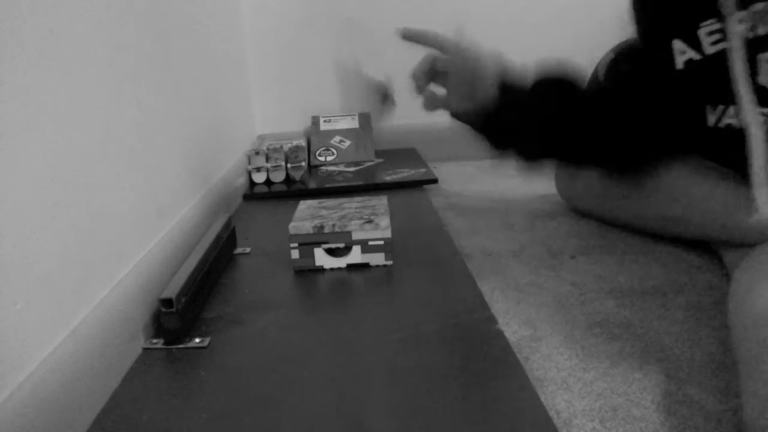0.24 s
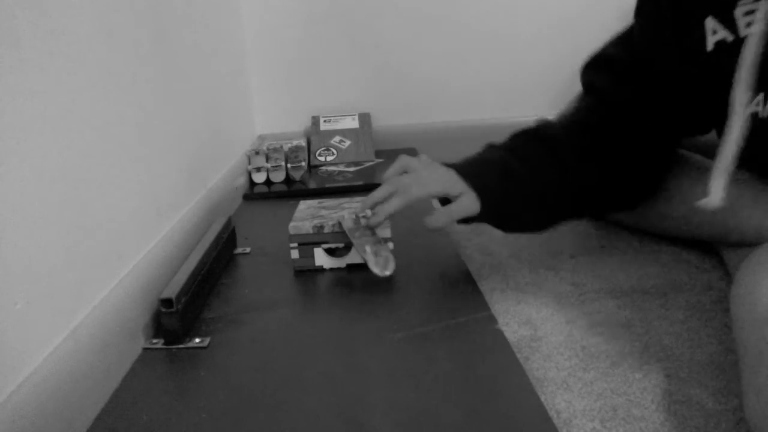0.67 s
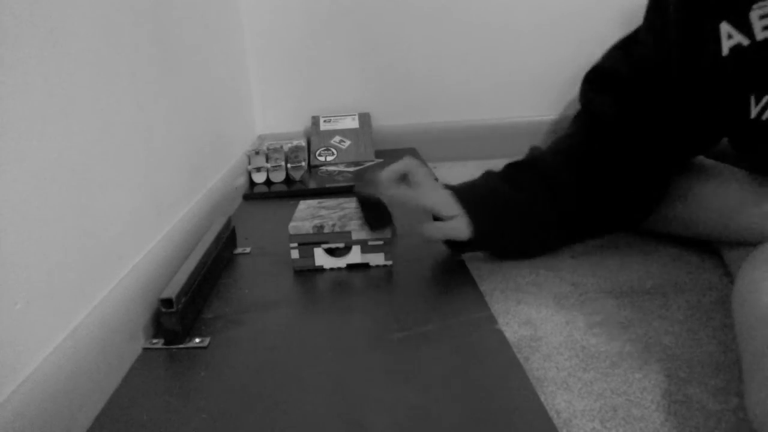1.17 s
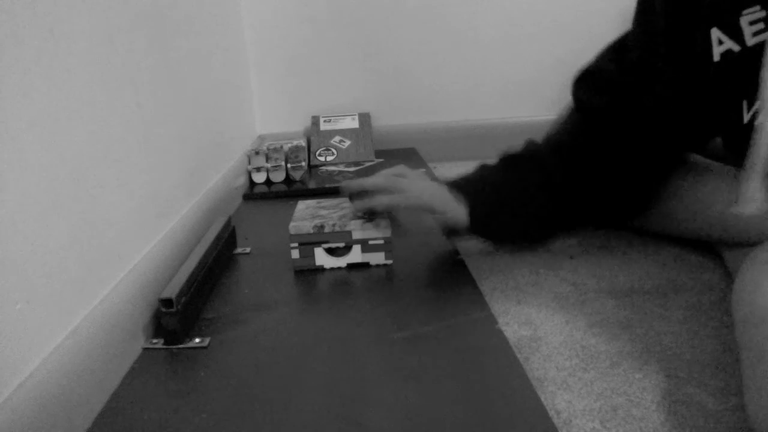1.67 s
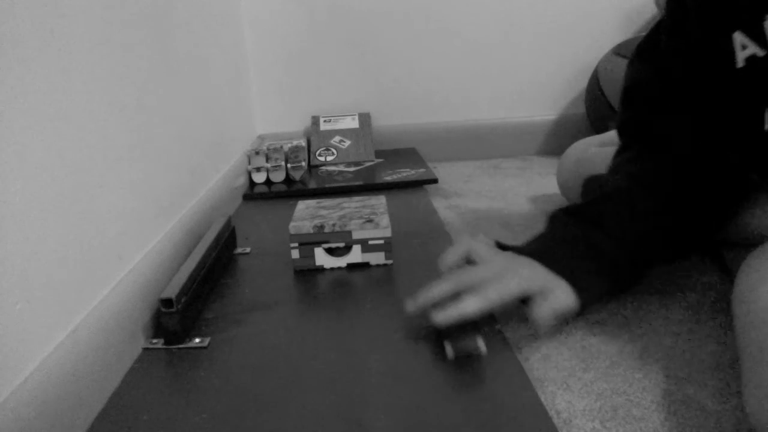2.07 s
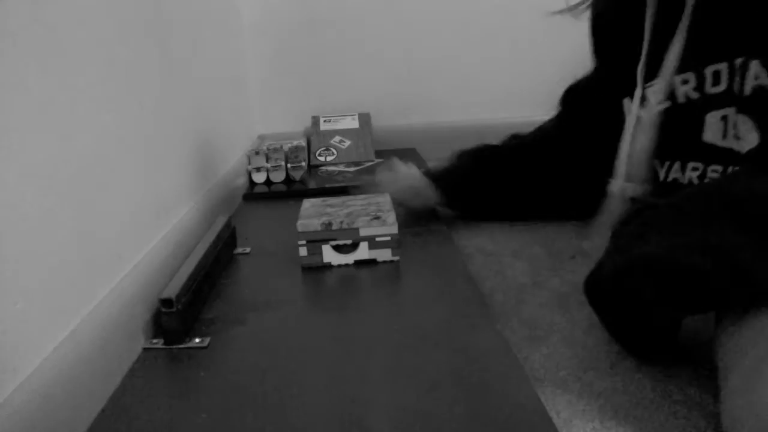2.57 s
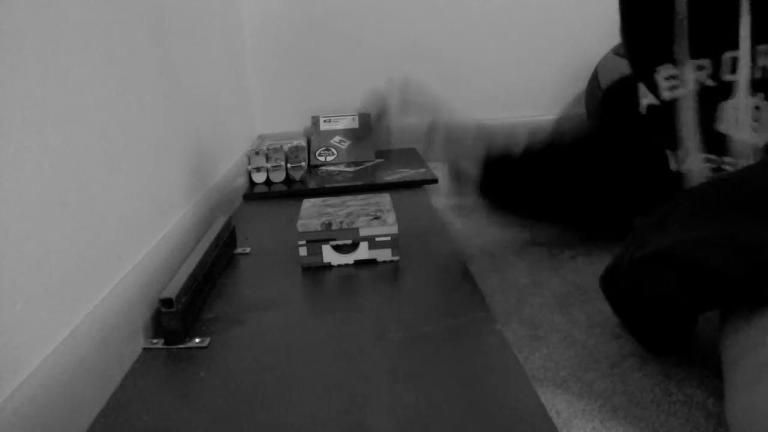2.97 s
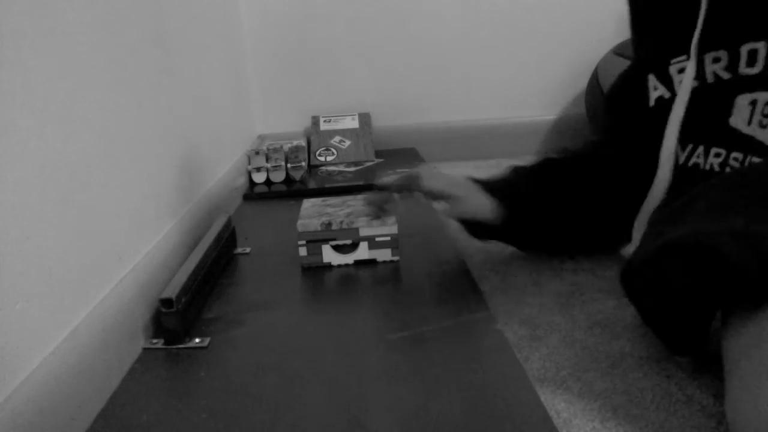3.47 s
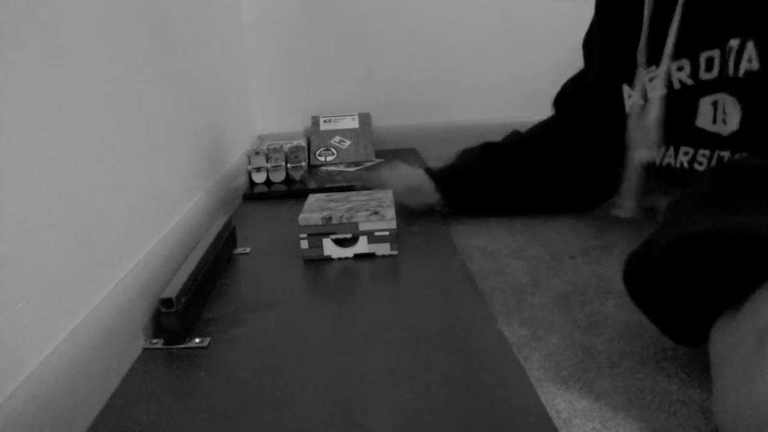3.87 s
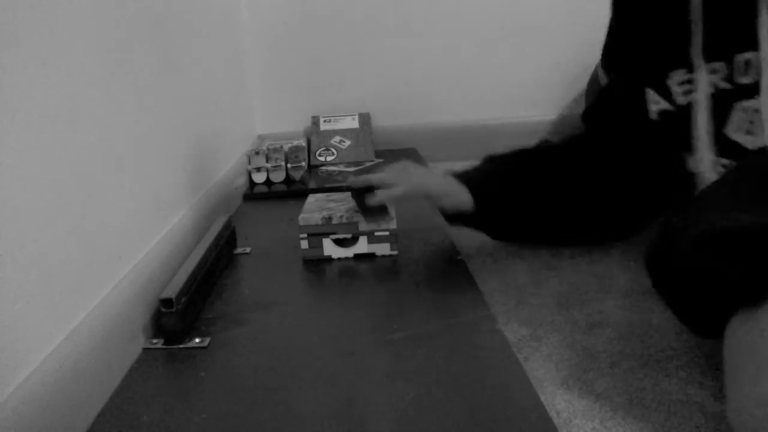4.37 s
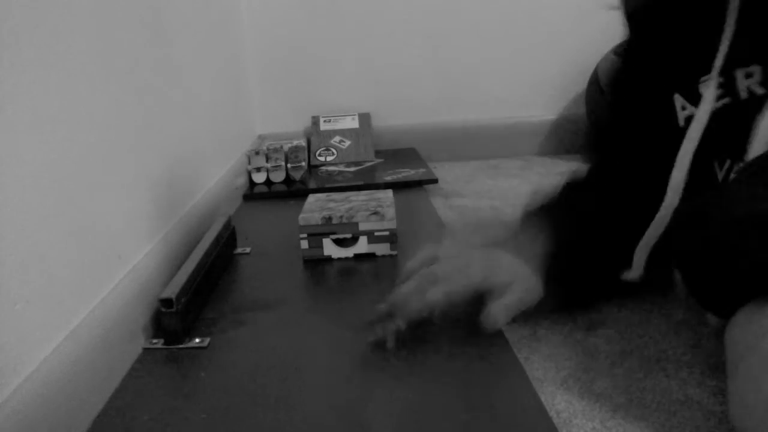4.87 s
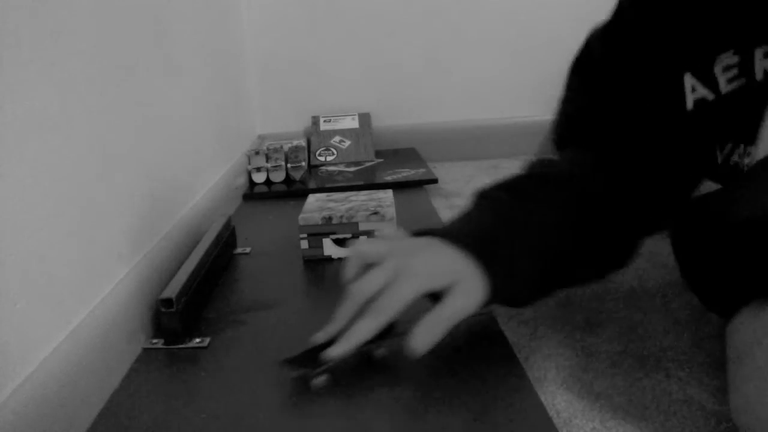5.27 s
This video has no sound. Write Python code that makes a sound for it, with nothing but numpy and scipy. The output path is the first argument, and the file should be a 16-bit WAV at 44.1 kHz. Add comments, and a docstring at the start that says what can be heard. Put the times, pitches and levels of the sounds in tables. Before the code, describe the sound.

A toy-sized skateboard is handled close to the microphone in a small hard room, under strong, wide, steady hiss and a barely audible low house drone. Pops and clicks come at once, with a loud wooden clack at 0.3 s. Small ticks and gritty wheel rolling follow until a quick, softer rattle of metallic clicks and box thumps at 1.05-1.2 s. A tight burst of bright, hard clacks lands at 1.7-1.85 s, then the wheels roll with light ticks and a modest knock at 2.65 s. Another cluster hits at 3.0 s, and a strong clack at 3.5 s. Bright fingertip swishes are scattered throughout, clearest near 3.4 s. A brief woody scuff rubs at 3.8-3.95 s; lesser taps fall at 4.0, 4.2 and 4.45 s. A last hard clacking landing comes at 4.8-4.9 s, with short room reflections. Hiss fades from about 4.3 s, leaving very faint scraping towards near silence at 5.5 s.

```python
"""In a small room, a miniature skateboard is popped, caught and landed on a hollow box and a wooden panel.
Each contact thumps the box, clacks the deck and clicks the metal trucks by driving their resonances with a
short push; room tails and a smeared far-wall echo 23 ms later follow. Gritty noise makes the rolling wheels,
with ticks over grit; narrow and bright friction noises make deck scuffs and fingertips on the grip tape.
Behind lie a low drone of the house and a strong stereo microphone hiss that fades toward the end."""
import sys
import numpy as np
from scipy import signal
from scipy.fft import rfft, irfft, next_fast_len
from scipy.io import wavfile
from scipy.ndimage import map_coordinates

SR = 44100
rng = np.random.default_rng(int(sys.argv[2]) if len(sys.argv) > 2 else 0)


def pcm_store(signal):
    """Save signal as 16-bit PCM."""
    levels = np.round(np.clip(np.atleast_2d(signal), -1, 1) * 32767)
    wavfile.write(sys.argv[1], SR, levels.astype(np.int16).T)


N = 243873
SPAN = 2 ** 14  # samples given to each contact or swish, with its reflections

# Pops, catches, landings and bounces. Levels are peaks of the direct sound, before the bass cut:
# [t/s, deck clack level/dB, box thump level/dB re clack, truck click level/dB re clack,
#  fizz level/dB re clack, contact t60/s, clack centre f/Hz, click centre f/Hz, thump centre f/Hz]
CONTACTS = [(.001, -12.5, -28, -2.5, -13.5, 0.021, 1590, 4000, 420),
            (0.075, -24.5, -34, 15.5, 9.5, 0.02, 2920, 3600, 573),
            (.229, -4, -2.5, 3, -6.5, .013, 920, 4180, 334),
            (0.252, -24.5, 13.5, 16.5, 0, .018, 875, 4090, 221),
            (0.27, -24.5, 3, 11.5, 0.5, 0.013, 818, 4440, 213),
            (.309, 7.5, -12, -5.5, -14.5, 0.019, 1490, 3400, 233),
            (1.07, -16, 0.5, -3, -1, .018, 2650, 4300, 282),
            (1.083, -19, 9, 7.5, -2.5, .02, 1280, 4570, 281),
            (1.095, -29.5, 7.5, 17.5, -10.5, .028, 802, 4360, 358),
            (1.107, -24.5, 5.5, 14.5, -8.5, .022, 1260, 4370, 259),
            (1.125, -20, 0.5, 10, -11, 0.019, 1800, 4530, 330), (1.151, -15, 2, 9, 2, .018, 859, 4450, 305),
            (1.176, -21.5, -11.5, 12.5, -13, 0.028, 1750, 4220, 288),
            (1.217, -21.5, -33, 3, -6, 0.02, 1770, 5140, 180),
            (1.602, -21, -3.5, 10, 4, .012, 2820, 4380, 269),
            (1.672, -14.5, -22.5, -12.5, -7.5, .014, 1940, 3110, 428),
            (1.681, -11.5, -20, -19, -3.5, .02, 1950, 5250, 409),
            (1.725, 4.5, -24.5, -7, -10, 0.018, 2950, 3000, 700),
            (1.73, 7, -13, -2.5, -8.5, 0.019, 2100, 3660, 406),
            (1.745, -4.5, -18.5, 4.5, -18, 0.016, 1206, 5850, 405),
            (1.752, -8, -5, 5.5, -16, 0.013, 1375, 4460, 382),
            (1.818, -9, -10.5, -12.5, -6, .021, 1710, 3370, 642),
            (1.839, -12, -23, -21, -26, 0.015, 1900, 5070, 640),
            (2.22, -27.5, -15, 12.5, 7.5, .012, 848, 5600, 697),
            (2.643, -12, -3, 1, -6, .019, 1800, 3600, 704),
            (2.972, -17.5, -2, 2.5, 4, 0.0079, 937, 4900, 245),
            (2.991, -1, -3, 5.5, -15, .01, 1210, 3900, 374),
            (3.004, -10.5, -12, 8, -8, .013, 796, 3400, 240),
            (3.017, -12, -2, 11.5, -16, .018, 2300, 3840, 234),
            (3.042, -10, 0, 2.5, -21.5, 0.027, 840, 3970, 233),
            (3.439, -20, 2, 10.5, 4.5, .01, 877, 3570, 231),
            (3.518, 5.5, -13.5, -4.5, -15, 0.043, 1350, 4000, 332),
            (3.525, -3.5, -4.5, -3.5, -21, .031, 1840, 3900, 565),
            (3.622, -16, -29, -16.5, -15, 0.035, 1730, 4260, 649),
            (4.0, -10.5, -1, 4, -0.5, 0.015, 1500, 3650, 700),
            (4.2, -15.5, -4, 8.5, 7, 0.0074, 1990, 3850, 228),
            (4.207, -17.5, -10.5, 8.5, -11, 0.02, 3030, 3870, 412),
            (4.447, -10.5, -6, 8.5, 3.5, 0.0041, 1740, 4980, 326),
            (4.802, 0.5, -26.5, -4.5, -3, 0.013, 2910, 4600, 350),
            (4.807, -0.5, -8, 0.5, -15, 0.03, 1020, 3540, 225),
            (4.843, 0.5, -12.5, -7, -12, 0.019, 960, 3400, 315),
            (4.883, -5.5, -13.5, -12, -19, 0.013, 2000, 3630, 349)]
# Wheel rumble before contacts stir it up: [t/s, level/dB]
ROLLING = [(0.0, -34), (0.6, -34.5), (1.06, -33), (1.45, -32.5), (1.65, -32.5), (2.05, -30), (2.3, -34),
           (2.7, -32), (3.2, -32.5), (3.45, -33), (4.08, -32), (4.39, -40), (4.54, -36), (4.77, -44),
           (5.05, -43.5), (5.3, -50), (5.53, -59.5)]


def amp(db):
    """Turn dB into gain."""
    return 10 ** (np.asarray(db) / 20)


def unit(x):
    """Bring a sound to rms 1."""
    return x / np.sqrt(np.mean(x ** 2) + 1e-20)


def curve(rows):
    """Draw straight lines through (s, value) rows, one value per sample."""
    return np.interp(np.arange(N) / SR, *np.transpose(rows))


def along(points, hz):
    """Read (Hz, value) points on a log frequency axis."""
    f, v = np.transpose(points)
    return np.interp(np.log(hz + 1), np.log(f + 1), v)


def wobble(rate):
    """Draw a smooth random curve with rate knots a second."""
    knots = rng.standard_normal(int(N * rate / SR) + 4)
    return map_coordinates(knots, [np.arange(N) * rate / SR])


def filtered(x, response):
    """Multiply the spectrum of x by a response of frequency."""
    m = next_fast_len(N + 8192)
    hz = np.fft.rfftfreq(m, 1 / SR)
    return irfft(rfft(x, m) * response(hz), m)[..., :N]


def hiss(level_db):
    """Microphone noise whose left-right correlation depends on frequency, with a slightly unsteady level."""
    # Spectrum of the hiss, relative: [f/Hz, level/dB per Hz]
    hiss_colour = [(15, -40), (25, -6), (141, -22), (489, 0), (531, -4), (641, -3), (1890, -2), (2220, -4),
                   (7920, -8), (12200, -4), (16000, -11)]
    # Likeness of the two channels: [f/Hz, left-right correlation]
    likeness = [(60, 0.55), (1000, -0.42), (7000, -0.15), (15000, -0.13)]

    def mid_and_side(hz):
        angle = np.arccos(np.clip(along(likeness, hz), -1, 1)) / 2
        return amp(along(hiss_colour, hz)) * [np.cos(angle), np.sin(angle)]

    mid, side = filtered(rng.standard_normal((2, N)), mid_and_side)
    stereo = unit(np.array([mid + side, mid - side]))
    return amp(level_db + 0.3 * wobble(11) + 0.47 * wobble(2.6)) * stereo


def hum():
    """A faint drone of the house: noise in a narrow band at 95 Hz that swells slowly."""
    # Level of the drone before its random swell: [t/s, level/dB]
    drone_level = [(0.0, -63), (0.83, -67), (1.26, -55), (2.76, -66), (3.38, -57), (4.4, -63), (4.63, -73),
                   (5.12, -65), (5.5, -80)]
    swell_db = -2 * wobble(1.5)
    drone = filtered(rng.standard_normal(N), lambda hz: 1 / (1 + ((hz - 95) / 22) ** 2))
    return amp(curve(drone_level) + swell_db) * unit(drone)


def swishes():
    """Fingertips slip on the grip tape: short, very bright puffs of friction noise."""
    # Puffs, their noise set 7 dB under the nominal peak: [t/s, nominal peak level/dB, centre f/Hz]
    puffs = [(0.1096, -16.5, 12100), (0.239, -18.5, 10000), (0.4609, -21.5, 12640), (0.7632, -21.5, 13500),
             (1.4032, -23.5, 12000), (1.4517, -17, 10300), (1.5549, -25, 12130), (1.8817, -24, 11140),
             (1.953, -21, 12200), (2.7482, -22, 12500), (3.2345, -18.5, 10700), (3.405, -12.5, 10700),
             (4.0991, -22, 12150)]
    t60_s, rise_s, width_hz = 0.13, 0.0017, 2500
    out, t = np.zeros(N + SPAN), np.arange(SPAN) / SR
    f = np.fft.rfftfreq(SPAN, 1 / SR)
    for s, db, centre_hz in puffs:
        band = 1 / (1 + ((f - centre_hz) / width_hz) ** 2)
        puff = unit(irfft(rfft(rng.standard_normal(SPAN)) * band))
        envelope = amp(db - 7 - 60 * t / t60_s) * (1 - np.exp(-t / rise_s))
        out[round(s * SR):][:SPAN] += envelope * puff
    return out[:N]


def scuffs():
    """The deck slides on the panel: friction noise in one narrow ring that drifts in pitch."""
    # Rubs: [start t/s, peak t/s, end t/s, peak level/dB, ring at start f/Hz, ring at end f/Hz]
    rubs = [(3.722, 3.79, 3.96, -37, 1510, 1265), (3.8, 3.896, 3.88, -24.5, 1080, 1016),
            (3.784, 3.93, 3.99, -42.5, 227, 224), (5.045, 5.075, 5.095, -37.5, 1233, 1175),
            (5.089, 5.13, 5.26, -41, 1247, 1350), (5.15, 5.28, 5.5, -48, 1320, 1460)]
    ring_q = 7  # ring frequency over width
    edge_drop_db, edge_s = 13, 0.018  # start and end level under the peak; fade at either end
    t, out = np.arange(N) / SR, np.zeros(N)
    for start, peak, end, db, start_hz, end_hz in rubs:
        slip = filtered(rng.standard_normal((2, N)), lambda hz: 1 / (1 + (hz * ring_q / end_hz) ** 2))
        phase = 2 * np.pi * np.cumsum(curve([(start, start_hz), (end, end_hz)])) / SR
        # slow noise carried up to the ring frequency
        ring = unit(slip[0] * np.cos(phase) + slip[1] * np.sin(phase))
        level_db = curve([(start, db - edge_drop_db), (peak, db), (end, db - edge_drop_db)])
        edge = np.clip(np.minimum(t - start, end - t) / edge_s, 0, 1)
        out += edge * amp(level_db) * ring
    return out


def shaken(rolling_db, blows_db):
    """Level in dB of a rolling noise: each contact leaves wheels and panel shaking for a moment."""
    shake_t60_s = 0.53
    since = np.arange(N) / SR - np.transpose(CONTACTS)[0][:, None]
    stir_power = (since >= 0) * amp(blows_db[:, None] - 60 * np.abs(since) / shake_t60_s) ** 2
    return 10 * np.log10(amp(rolling_db) ** 2 + stir_power.sum(axis=0))


def wheels(rumble_db, rattle_db, boom_db):
    """Grit under the wheels: dense uneven kicks and noise, in clumps, shake the panel and the bearings."""
    # Spectrum of the rumble, relative: [f/Hz, level/dB per Hz]
    rumble_colour = [(88, -43), (150, -14), (198, -30.5), (229, -11), (264, -36.5), (302, -6.5),
                     (623, -0.5), (1550, 0.5), (3500, -8), (4550, -16), (7700, -120)]
    # Spectrum of the rattle, relative: [f/Hz, level/dB per Hz]
    rattle_colour = [(1650, -40), (2800, -13), (7000, -11.5), (9100, -17.5), (15400, -120)]
    kicks = (rng.random(N) < 4000 / SR) * rng.standard_normal(N)  # about 4000 a second
    grit = .5 * unit(kicks) + rng.standard_normal(N)
    bumps = wobble(30)  # clumps shared by rumble and rattle
    rumble = filtered(grit, lambda hz: amp(along(rumble_colour, hz)))
    rumble = unit(amp(2.24 * bumps + 2.1 * wobble(90)) * rumble)
    rattle = filtered(grit, lambda hz: amp(along(rattle_colour, hz)))
    rattle = unit(amp(0.61 * bumps + 4.3 * wobble(40)) * rattle)
    boom = unit(filtered(grit, lambda hz: 1 / (1 + ((hz - 220) / 80) ** 2)))  # the panel's lowest modes
    return amp(boom_db) * boom + amp(rumble_db) * rumble + amp(rattle_db) * rattle


def ticks(count):
    """Wheels tick over grit: rows like CONTACTS, the clear ticks first, then faint ones at chance moments."""
    # The clearest ticks: [t/s, clack peak level/dB, clack centre f/Hz]
    clear = [(0.041, -16, 1930), (0.576, -23, 2400), (0.729, -14, 1770), (0.791, -20, 947),
             (0.846, -19, 2600), (0.889, -20.5, 2850), (0.934, -16, 1750), (0.954, -15, 1350),
             (1.514, -17.5, 1680), (2.243, -20.5, 988), (2.27, -19.5, 982), (2.305, -14.5, 1340),
             (2.365, -16, 1600), (2.474, -16.5, 2050), (2.846, -19.5, 1150), (2.906, -21, 1900),
             (2.937, -24, 2500), (1.044, -19, 2500), (3.141, -15, 1250), (3.382, -17, 1580),
             (3.73, -21, 1500), (0.092, -21, 2900), (4.669, -26, 1510), (4.783, -25.5, 2000),
             (5.19, -39.5, 1500)]
    # Shared by all ticks: [thump level/dB re clack, click level/dB re clack, fizz level/dB re clack,
    #  t60/s (limited to .003-.08 as for all contacts), click centre f/Hz, thump centre f/Hz]
    tick_body = (-20.5, -5, -2, -0.15, 3700, 581.5)
    over_roll_db, middle_hz = 10, 1700  # faint ticks: mean peak over the rolling level, median clack centre
    s = rng.random(count) * N / SR
    draw = rng.standard_normal((count, 2))
    faint_db = np.interp(s, *np.transpose(ROLLING)) + over_roll_db + 2 * draw[:, 0]
    faint_hz = middle_hz * 2 ** (.5 * draw[:, 1])
    faint = np.transpose([s, faint_db, faint_hz])
    thump_db, click_db, fizz_db, t60, click_hz, thump_hz = tick_body
    return [(at, db, thump_db, click_db, fizz_db, t60, hz, click_hz, thump_hz)
            for at, db, hz in [*clear, *faint]]


def rings(modes, f, scatter_db, centre_hz, lean_db):
    """Causal response of a body; the place of contact favours modes near centre_hz, by lean_db an octave."""
    draw = rng.standard_normal((len(centre_hz), len(modes)))
    lean = -lean_db * np.abs(np.log2(np.transpose(modes)[0] / centre_hz))
    each = []
    for k, (mode_hz, width_hz, db) in enumerate(modes):
        damping = 1j * f * width_hz
        resonance = damping / (mode_hz * mode_hz - f * f + damping)
        each.append((-1) ** k * amp(db) * resonance)  # neighbours alternate in sign
    return amp(scatter_db * draw + lean) @ np.array(each)


def noise_bursts(envelope, count):
    """Spectra of count noise bursts of energy 1 under one or many envelopes."""
    burst = rng.standard_normal((count, SPAN)) * envelope
    return rfft(burst / np.linalg.norm(burst, axis=1, keepdims=True))


def tails(count):
    """Spectra of count room tails of energy 1, each frequency dying at its own speed."""
    # Decay of the room, at least .02 s being used: [f/Hz, t60/s]
    room_decay = [(100, 0.084), (250, 0.23), (1000, 0.22), (4000, 0.33), (8000, 0.29), (15000, 0.029)]
    hz, t, z = signal.stft(rng.standard_normal((count, SPAN)), SR, nperseg=256)
    decay = amp(-60 * t / np.maximum(along(room_decay, hz), .02)[:, None])
    tail = signal.istft(z * decay, SR, nperseg=256)[1][:, :SPAN]
    tail *= 1 - np.exp(-np.arange(SPAN) / SR / 0.0058)  # reflections build up
    return rfft(tail / np.linalg.norm(tail, axis=1, keepdims=True))


def contacts():
    """A clean push thumps the box, a jagged one drives deck and trucks; the room and the far wall answer."""
    # Resonances of the hollow box, levels relative: [f/Hz, width/Hz, level/dB]
    box_modes = [(157.6, 6.8, -5.5), (227.8, 32, 2), (305, 56, -3.5), (343.7, 42, 1), (413.4, 48, -3),
                 (573.4, 89, -3), (754, 54, -4.5)]
    # Resonances of the deck, levels relative: [f/Hz, width/Hz, level/dB]
    deck_modes = [(905, 144, 4), (1338, 97, 1.5), (1427, 89, 1), (1763, 410, -0.5), (2009, 130, 8),
                  (2057, 247, 5), (2608, 105, 2.5), (2970, 230, 1)]
    # Resonances of the metal trucks, levels relative: [f/Hz, width/Hz, level/dB]
    truck_modes = [(3154, 450, 0), (3507, 630, -2), (4060, 620, -0.5), (4720, 990, -3), (5330, 375, -1.5),
                   (5580, 360, -3), (6880, 1500, -11.5)]
    # Broad bands of the treble fizz, levels relative: [f/Hz, width/Hz, level/dB]
    fizz_modes = [(7870, 6400, 15.5), (11900, 6900, 16)]
    # Room tail: [f/Hz, level/dB re direct]
    room_level = [(100, 1.5), (300, -4.5), (1200, -9.5), (4000, -11), (8000, -7), (15000, 4)]
    # Answer of the far wall: [f/Hz, level/dB]
    wall_level = [(500, -24), (2500, -24.5), (4200, -7), (6000, -6.5), (9000, -22)]
    wall_delay_s, wall_smear_t60_s = .023, 0.077
    push_rise_s = 0.00038  # wheels and tail do not land in one instant

    rows = [*CONTACTS, *ticks(count=12)]
    count = len(rows)
    s, clack_db, thump_db, click_db, fizz_db, t60, clack_hz, click_hz, thump_hz = np.transpose(rows)[..., None]
    # dB an octave away from the centre, .37 dB less for each dB of a harder blow
    deck_lean_db, truck_lean_db = [np.maximum(db - 0.37 * clack_db, 0) for db in (9, 11.5)]
    t, f = np.arange(SPAN) / SR, np.fft.rfftfreq(SPAN, 1 / SR)
    push = noise_bursts(amp(-60 * t / np.clip(t60, .003, .08)) * (1 - np.exp(-t / push_rise_s)), count)

    direct = blow = 0
    for drive, body, db in (
            (1, rings(box_modes, f, 1, thump_hz, lean_db=6.0), thump_db),
            (push, rings(deck_modes, f, 1.0, clack_hz, lean_db=deck_lean_db), 0),
            (push, rings(truck_modes, f, 1.0, click_hz, lean_db=truck_lean_db), click_db),
            (push, rings(fizz_modes, f, 1, click_hz, lean_db=0), fizz_db)):
        peak = np.abs(irfft(drive * body)).max(axis=1, keepdims=True)
        gain = amp(clack_db + db) / peak
        direct = direct + gain * drive * body
        blow = blow + gain * body  # the sound sent out in all directions has the bodies' plain colour

    # the wall is uneven: its echo is smeared over several ms
    smear = noise_bursts(amp(-60 * t / wall_smear_t60_s), count)
    echo = smear * amp(along(wall_level, f)) * np.exp(-2j * np.pi * f * wall_delay_s)
    room = amp(along(room_level, f)) * tails(count)
    heard = irfft(direct + blow * (echo + room))
    out = np.zeros(N + SPAN)
    for at, sound in zip(np.round(s[:, 0] * SR).astype(int), heard):
        out[at:at + SPAN] += sound
    return out[:N]


def scene():
    """Board, wheels and drone slightly to the right, under a stereo hiss."""
    # Fade of hiss and rattle: [t/s, level/dB]
    fade = [(0.0, 0), (0.5, -1), (2.0, 0), (3.8, 0.5), (4.3, -2.5), (4.77, -10), (5.0, -17), (5.3, -25),
            (5.53, -36)]
    hiss_db, rattle_db, boom_db = -27, -38, -55  # before the fade
    boom_fade_share = 0.082  # the panel boom follows this share of the fade
    shake_rumble_db, shake_boom_db = -31.5, -30.5  # stirred by a contact: re clack, re thump
    fade_db = curve(fade)
    _, clack_db, thump_db, *_ = np.transpose(CONTACTS)
    rumble_level = shaken(curve(ROLLING), clack_db + shake_rumble_db)
    boom_level = shaken(boom_db + boom_fade_share * fade_db, clack_db + thump_db + shake_boom_db)
    # small bodies send out no deep bass
    hits = filtered(contacts(), lambda hz: (1j * hz / (110 + 1j * hz)) ** 2)
    rolling = wheels(rumble_level, rattle_db + fade_db, boom_level)
    board = hits + rolling + scuffs() + swishes() + hum()
    return board * amp([[-.2], [.2]]) + hiss(hiss_db + fade_db)


def record(dry):
    """The microphone end: loud landings clip softly, deep bass and top treble drop, then a hard band limit."""
    mic_edge_hz, top_hz = 15800, 16440  # 31 dB down above the first, nothing from the second up
    clipped = dry / (1 + np.abs(dry / .95) ** 6) ** (1 / 6)

    def response(hz):
        bass_cut = 1j * hz / (45 + 1j * hz)
        return bass_cut * np.where(hz < mic_edge_hz, 1, amp(-31)) * (hz < top_hz)

    return filtered(clipped, response)


dry = scene()
out = record(dry)
pcm_store(out)
```